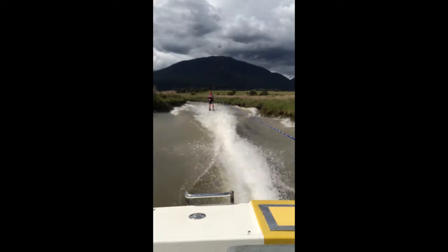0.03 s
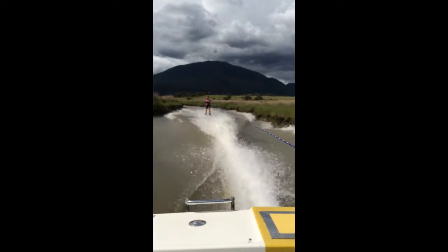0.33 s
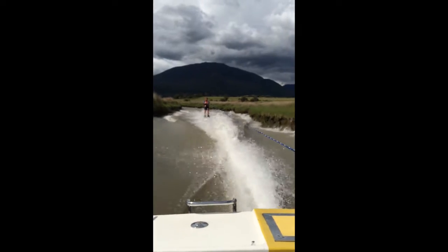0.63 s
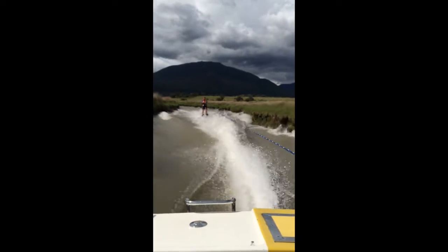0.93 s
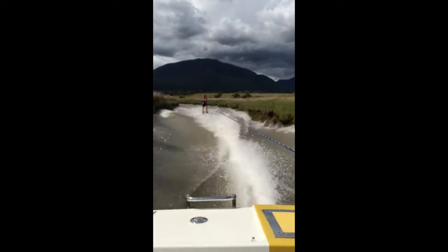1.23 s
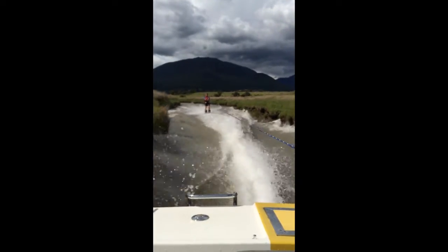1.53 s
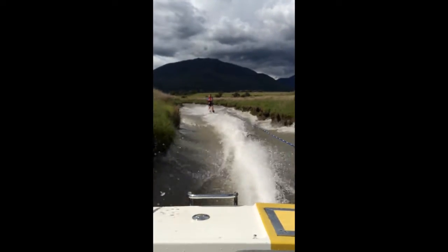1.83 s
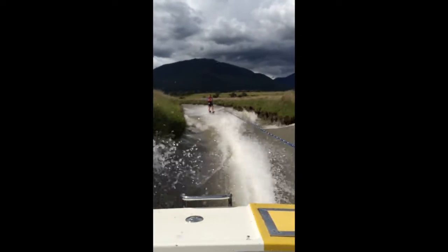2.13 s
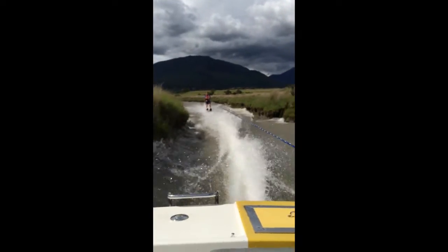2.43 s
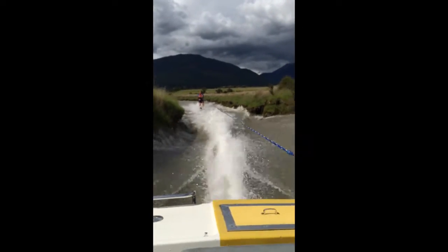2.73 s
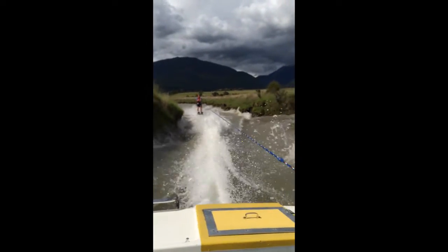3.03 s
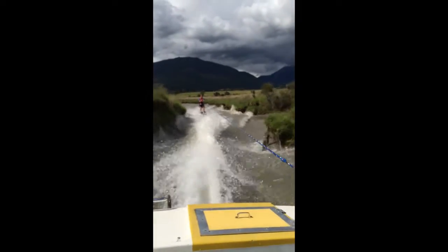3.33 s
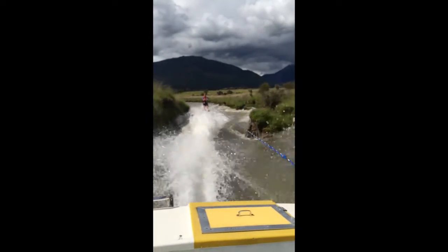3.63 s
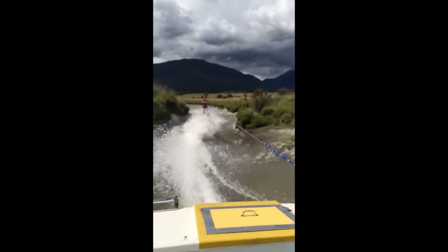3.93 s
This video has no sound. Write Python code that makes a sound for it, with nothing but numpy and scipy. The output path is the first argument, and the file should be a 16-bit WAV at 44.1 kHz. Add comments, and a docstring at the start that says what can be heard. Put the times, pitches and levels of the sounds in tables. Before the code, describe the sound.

A motorboat engine drones steadily, heard on board, with hissing spray and light wind.

```python
"""A ski boat's eight-cylinder engine drones at steady speed on a canal, heard from on board.
Its wet exhaust throbs with the uneven banks, flutters as water covers the pipe and burbles with
each firing; gears and valves ring over clatter and a thin whine. Behind it the wake hisses into
spray, one wave slaps the hull and wind bumps the microphone. A limiter holds the peaks."""
import sys
import numpy as np
from scipy import signal
from scipy.fft import rfft, irfft, next_fast_len
from scipy.io import wavfile
from scipy.ndimage import uniform_filter1d, minimum_filter1d, map_coordinates

SR = 44100
rng = np.random.default_rng(int(sys.argv[2]) if len(sys.argv) > 2 else 0)


def transcribe(signal):
    """Save signal, clipped to [-1, 1], as a 16-bit WAV file at the path in sys.argv[1]."""
    frames = np.atleast_2d(signal).T
    limited = np.clip(frames, -1, 1)
    pcm = np.round(limited * 32767).astype(np.int16)
    wavfile.write(sys.argv[1], SR, pcm)


N = 176400
CYLINDERS, THROB_ORDER = 8, 5  # an order is a multiple of the engine cycle rate

# Firing rate of the engine: t/s, f/Hz
FIRING_RATE = [(0, 181.55), (.9, 181.4), (1.4, 181.1), (1.8, 181.4), (2.2, 182.0), (2.6, 181.4),
               (3.15, 180.5), (3.7, 181.35), (4, 181.55)]
# Fader for the throb of the uneven banks: t/s, level/dB
THROB_FADER = [(0, -15.5), (.15, -14), (.31, -19), (.5, -13.5), (.75, -13), (1.1, -13.5), (1.35, -16.5),
               (1.55, -21.5), (1.78, -22.5), (1.88, -18.5), (1.98, -27.5), (2.25, -18.5), (2.5, -16.5),
               (2.68, -15.5), (3.1, -18), (3.27, -21), (3.38, -13.5), (3.46, -20), (3.7, -16), (4, -19)]
# Fader for the drone at the firing rate: t/s, level/dB
DRONE_FADER = [(0, -13.5), (.22, -16), (.38, -13.5), (1.05, -15), (1.5, -14), (1.63, -16.5), (1.76, -10.5),
               (1.85, -15), (1.96, -9.5), (2.12, -19.5), (2.19, -13), (2.35, -12.5), (2.65, -16.5),
               (2.78, -12), (2.95, -18), (3.22, -18.5), (3.3, -14), (3.42, -18.5), (3.55, -15.5),
               (3.8, -14), (3.9, -18.5), (4, -14)]
# Fader for the exhaust's midrange growl: t/s, level/dB
GROWL_FADER = [(0, -33), (.8, -25.5), (1.3, -29.5), (1.8, -25.5), (2.15, -24.5), (2.7, -30.5), (3.5, -26),
               (4, -32)]
# Fader for the hum an octave above the growl: t/s, level/dB
HUM_FADER = [(0, -35), (.3, -28), (.65, -34.5), (1.1, -36), (1.9, -37), (2.3, -31.5), (3.1, -34),
             (3.8, -29.5), (4, -28.5)]
# Fader for the crankshaft's shake, strongest early on: t/s, level/dB
SHAKE_FADER = [(0, -26), (.45, -34), (.75, -26), (1.25, -31.5), (1.55, -51), (4, -44)]
# Weaker exhaust notes: order, level/dB
EXHAUST_OVERTONES = {4: -31, 6: -28.5, 7: -38, 9: -32.5, 10: -32.5, 11: -41.5, 13: -34, 14: -33.5, 15:
                     -41.5, 16: -32, 18: -41, 20: -48, 21: -42.5, 22: -35.5, 26: -44}
# Ring of the gears and valves: order, level/dB before the trim
GEAR_PARTIALS = {40: -49.5, 42: -49.5, 44: -52, 45: -48, 46: -42, 48: -48, 49: -45.5, 57: -46, 58: -48.5,
                 68: -51, 88: -53, 154: -56}
# Trim on that ring: t/s, gain/dB
GEAR_TRIM = [(0, -0.5), (1.2, -0.5), (1.7, 2), (2.3, 2), (2.8, -5), (4, -2.5)]
# Tone of gas bubbling through water: f/Hz, relative level/dB
BURBLE_EQ = [(20, -60), (50, -30), (90, -5.5), (140, 0), (200, 5), (250, -3), (320, -6.5), (400, -10),
             (500, -7.5), (600, -14), (750, -18.5), (1500, -43), (4000, -120)]
# Fader for the burble: t/s, level/dB
BURBLE_FADER = [(0, -20.5), (.7, -26), (1.25, -22.5), (1.6, -20.5), (2.1, -21), (2.7, -22.5), (2.95, -20.5),
                (3.2, -20), (3.6, -18.5), (4, -21.5)]
# Tone of the engine's clatter: f/Hz, relative level/dB
CLATTER_EQ = [(80, -60), (300, -32), (600, -3), (800, -1), (1100, 1), (1400, -.5), (1650, 0.5),
              (1900, -3.5), (2500, -4), (2850, -6.5), (3100, -10.5), (3600, -9), (4500, -15.5),
              (8000, -22.5), (16000, -38)]
# Fader for the machinery's whine: t/s, level/dB
WHINE_FADER = [(0, -54), (1, -50.5), (1.5, -55), (1.63, -47), (1.75, -54), (1.88, -49), (2.25, -53),
               (2.43, -47), (2.55, -55), (2.65, -48), (2.75, -51), (3.05, -51.5), (3.3, -53), (4, -58)]
# Swell of the wake, riding both spray and clatter: t/s, relative level/dB
WAKE_SWELL = [(0, -42.5), (.3, -42), (.42, -41), (.6, -41), (1.0, -42), (1.38, -42), (1.64, -38.5),
              (1.85, -40), (2.05, -40), (2.35, -39), (2.8, -40.5), (3.1, -40), (3.4, -38.5), (3.62, -39.5),
              (4, -38)]
# Bright hiss of the drops: f/Hz, relative level/dB
SPRAY_EQ = [(300, -26), (1000, 0), (2500, 3.5), (4500, -1), (7500, -3), (9000, -5), (12000, -7),
            (15000, -10.5)]
# Hollow tone of a wave on the hull: f/Hz, relative level/dB
SLAP_EQ = [(100, -120), (400, -25), (640, -4), (780, 4), (950, -12), (2000, -35), (5000, -120)]
# Low rumble of wind on the microphone: f/Hz, relative level/dB
WIND_EQ = [(10, -30), (25, -12), (38, -7), (48, 4.5), (70, 6.5), (95, 7), (140, 3), (300, -25),
           (1500, -120)]
# Fader for the gusts: t/s, level/dB
GUST_FADER = [(0, -27), (.05, -23), (.11, -20), (.22, -26), (.4, -32), (.5, -23), (.8, -24), (1.3, -23),
              (1.55, -30), (1.78, -30), (1.9, -26), (2.15, -27), (2.39, -30), (2.48, -17), (2.58, -24),
              (2.8, -29), (2.91, -22), (3.03, -29), (3.55, -26), (3.67, -21), (3.75, -28), (3.83, -18.5),
              (3.95, -28)]


def amp(db):
    """Decibels to gain."""
    return 10 ** (np.asarray(db) / 20)


def unit(x):
    """Scale to rms 1."""
    return x / np.sqrt(np.mean(x ** 2) + 1e-20)


def curve(rows):
    """Automation: (t/s, value) rows as one value per sample."""
    return np.interp(np.arange(N) / SR, *np.transpose(rows))


def wobble(rate):
    """Smooth random modulation, rate knots a second."""
    knots = rng.standard_normal(int(N * rate / SR) + 4)
    return map_coordinates(knots, [1 + np.arange(N) * rate / SR])


def filtered(x, response):
    """Filter x by a gain given as a function of frequency."""
    size = next_fast_len(N + SR // 2)
    return irfft(rfft(x, size) * response(np.fft.rfftfreq(size, 1 / SR)), size)[:N]


def noise(eq, patchy_db):
    """A noise bed of rms 1, coloured by eq and textured with patches of random gain."""
    spectrogram = signal.stft(rng.standard_normal(N), nperseg=512)[2]
    patches = uniform_filter1d(rng.standard_normal(spectrogram.shape), 8, axis=0)
    patches = uniform_filter1d(patches, 12, axis=1)
    textured = signal.istft(spectrogram * amp(patchy_db * unit(patches)), nperseg=512)[1][:N]
    eq_hz, eq_db = np.transpose(eq)
    return unit(filtered(textured, lambda hz: amp(np.interp(np.log(hz + 1), np.log(eq_hz), eq_db))))


def engine_note(cycle, order, flutter_db, wander_rad):
    """One sine of rms 1 that tracks the engine, unsteady in level and phase."""
    smear_rad = 1.164 * rng.standard_normal()  # pipe and hull scatter the notes out of step
    phase = 2 * np.pi * order * cycle + smear_rad + wander_rad * (wobble(6) + wobble(22) / 2)
    return -unit(amp(flutter_db * wobble(14)) * np.sin(phase))


def note_stack(cycle, levels, drift_db=1.33):
    """A stack of quiet engine notes, each drifting in level on its own."""
    stack = np.zeros(N)
    for order, db in levels.items():
        drift = amp(drift_db * wobble(2.94))
        stack += amp(db) * unit(drift * engine_note(cycle, order, flutter_db=1.84, wander_rad=.15))
    return stack


def engine_body(cycle):
    """Exhaust notes and crankshaft shake: they swell as the hull moves and flutter with the water."""
    body = amp(curve(THROB_FADER)) * engine_note(cycle, THROB_ORDER, flutter_db=.5, wander_rad=.038)
    body += amp(curve(DRONE_FADER)) * engine_note(cycle, CYLINDERS, flutter_db=.5, wander_rad=.11)
    body += amp(curve(GROWL_FADER)) * engine_note(cycle, order=12, flutter_db=1, wander_rad=.53)
    body += amp(curve(HUM_FADER)) * engine_note(cycle, order=24, flutter_db=2.55, wander_rad=.1)
    body += amp(curve(SHAKE_FADER)) * engine_note(cycle, order=2, flutter_db=2, wander_rad=.3)
    return body + note_stack(cycle, EXHAUST_OVERTONES)


def firing_pulse(cycle, depth, lope):
    """A tremolo that lifts with every firing and lopes with the uneven banks."""
    angle = 2 * np.pi * cycle
    uneven = np.cos(angle) + np.cos(2 * angle) + np.cos((CYLINDERS - THROB_ORDER) * angle)
    return unit(np.exp(depth * np.cos(CYLINDERS * angle) + lope * uneven))


def burble(cycle):
    """Exhaust gas puffs through the water: a dark, pulsing churn."""
    churn = noise(BURBLE_EQ, patchy_db=1.2)
    return churn * firing_pulse(cycle, depth=.24, lope=.12) * amp(curve(BURBLE_FADER))


def clatter(cycle, wake_db):
    """Lightly pulsing engine rattle that rides the wake's swell and blends into it."""
    rattle = noise(CLATTER_EQ, patchy_db=1.17) * firing_pulse(cycle, depth=.049, lope=.06)
    level_db = -31 + .55 * (wake_db - wake_db.mean()) + .13 * wobble(23)
    return rattle * amp(level_db)


def gear_ring(cycle):
    """Gears and valves ring at high multiples of the engine cycle."""
    return amp(curve(GEAR_TRIM)) * note_stack(cycle, GEAR_PARTIALS)


def whine(centre_hz=8210, width_hz=110):
    """A thin, fuzzy whistle from the machinery that comes and goes."""
    band = filtered(rng.standard_normal(N), lambda hz: 1 / (1 + 2j * (hz - centre_hz) / width_hz))
    return unit(band) * amp(curve(WHINE_FADER))


def spray(wake_db, boost_db=3):
    """The wake tears into a fine, even hiss of drops."""
    hiss = noise(SPRAY_EQ, patchy_db=.3)
    return hiss * amp(wake_db + boost_db + .15 * wobble(10) + .25 * wobble(70))


def hull_slap(at_s=2.96, half_width_s=.015, level_db=-27):
    """One wave hits the hull with a short, hollow slosh."""
    swell = np.exp(-((np.arange(N) / SR - at_s) / half_width_s) ** 2)
    return noise(SLAP_EQ, patchy_db=-3) * swell * amp(level_db)


def wind():
    """Gusts bump the microphone with low thuds."""
    return noise(WIND_EQ, patchy_db=1.2) * amp(curve(GUST_FADER))


def scene():
    """The mono mix: engine up front, water and wind behind."""
    cycle = np.cumsum(curve(FIRING_RATE)) / CYLINDERS / SR  # each cylinder fires once a cycle
    wake_db = curve(WAKE_SWELL)
    engine = engine_body(cycle) + gear_ring(cycle) + burble(cycle) + clatter(cycle, wake_db) + whine()
    return (engine + spray(wake_db) + hull_slap() + wind())[None]


def record(dry):
    """A fast limiter ducks the peaks, then a brick-wall low-pass trims the top."""
    ceiling, hold_s, ramp_s, top_hz = .72, .012, .0024, 15330
    mix = dry[0]
    needed_gain = np.minimum(1, ceiling / (np.abs(mix) + 1e-9))
    held_gain = minimum_filter1d(needed_gain, int(hold_s * SR) + 1)
    gain = uniform_filter1d(held_gain, int(ramp_s * SR) + 1)
    return filtered(mix * gain, lambda hz: hz < top_hz)[None]


dry = scene()
out = record(dry)
transcribe(out)
```